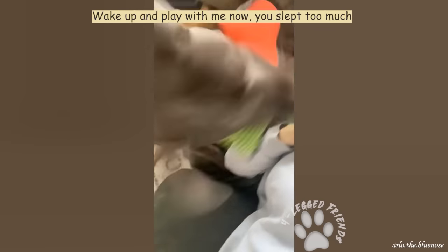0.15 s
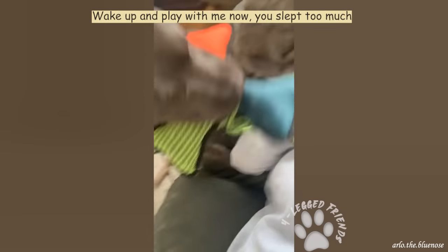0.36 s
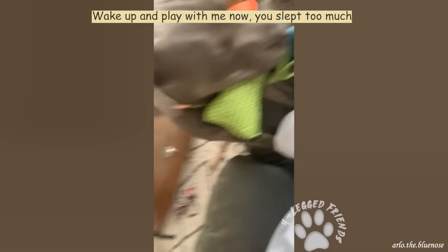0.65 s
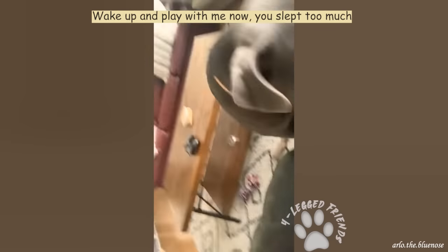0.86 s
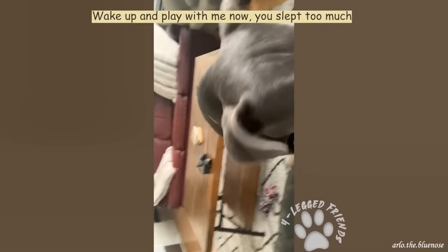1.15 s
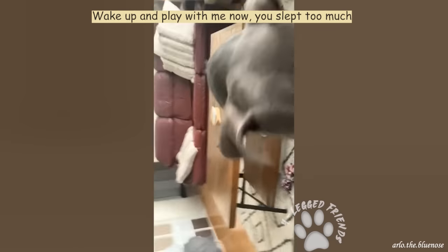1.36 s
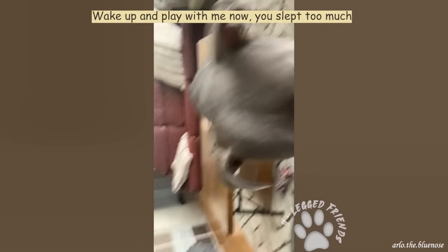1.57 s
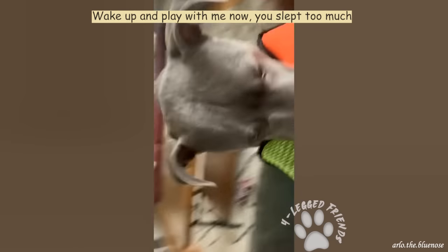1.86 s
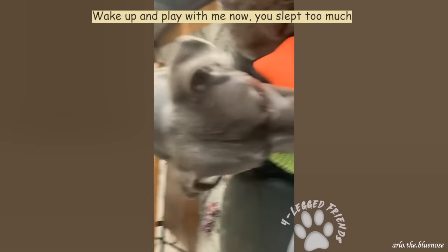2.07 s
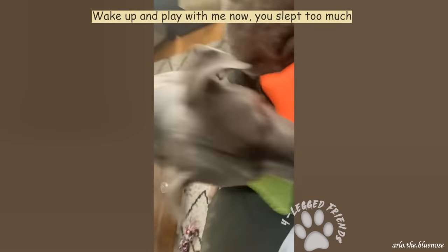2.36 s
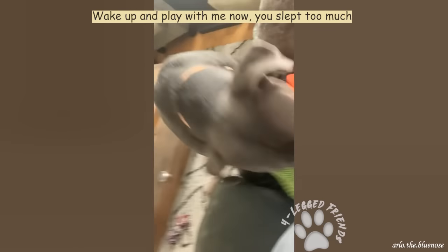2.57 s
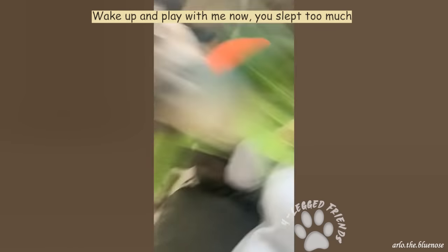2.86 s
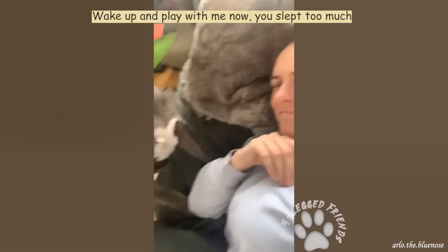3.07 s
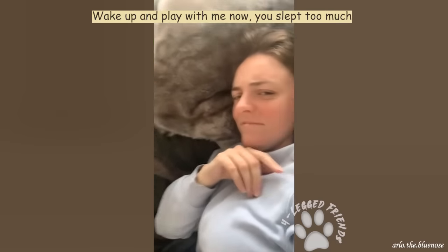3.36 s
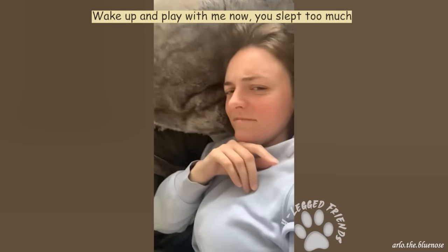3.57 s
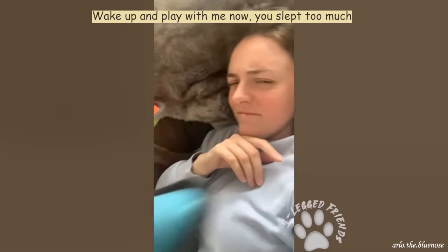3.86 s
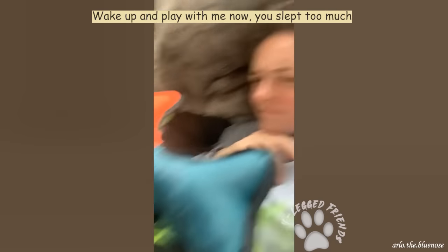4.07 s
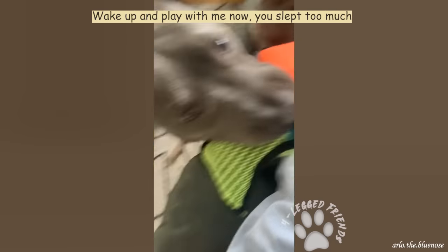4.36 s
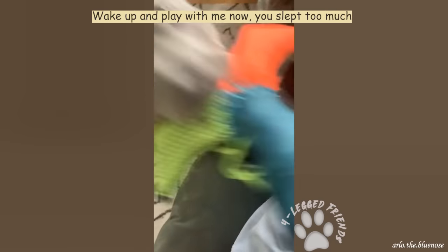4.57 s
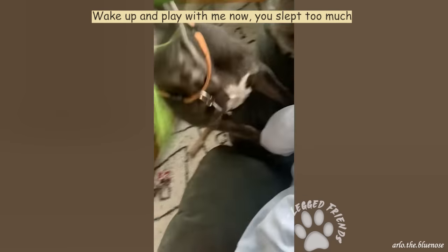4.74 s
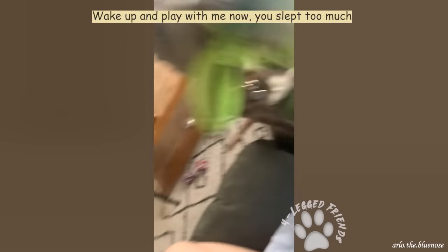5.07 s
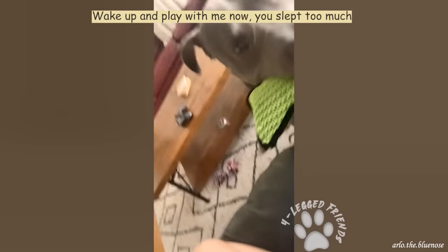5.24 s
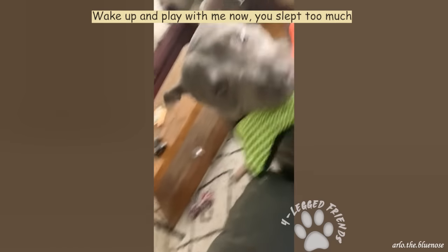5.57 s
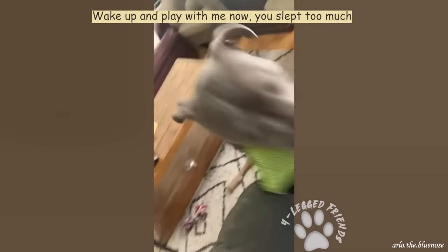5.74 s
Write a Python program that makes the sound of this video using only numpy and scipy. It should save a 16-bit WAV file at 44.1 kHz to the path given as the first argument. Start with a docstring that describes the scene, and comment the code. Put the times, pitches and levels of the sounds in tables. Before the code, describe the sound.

A dog bites a squeaky plush toy close by, sharp squeaks leaping from buzz to high whistle, over a low indoor hum.

```python
"""The room tail of an earlier squeak, fading noise, dies away first over a low hum of wavering sines and rumble.
After two dull knocks, made of damped rings, a dog bites a plush toy close by, in squeaks with a short room tail.
Hard bites sweep a reed from a buzz to a near-pure whistle; thin steady high sines sound during some whistles.
Falling chirps follow as the jaw lets go, and one early soft bite buzzes up and down in pitch.
A low drone swells and fades beneath, the level dips briefly midway, and soft bites and clicks end it."""
import sys
import numpy as np
from scipy import signal
from scipy.fft import rfft, irfft
from scipy.io import wavfile
from scipy.ndimage import uniform_filter1d, minimum_filter1d

SR = 44100
rng = np.random.default_rng(int(sys.argv[2]) if len(sys.argv) > 2 else 0)


def store_pcm(level_fs):
    """Save levels as 16-bit WAV."""
    pcm = np.round(np.clip(level_fs, -1, 1) * 32767).astype(np.int16)
    wavfile.write(sys.argv[1], SR, np.atleast_2d(pcm).T)


N = 260631  # samples
EDGE_HZ = 16300  # top of the audible band


def amp(db):
    """Decibels to gain."""
    return 10 ** (np.asarray(db) / 20)


def unit(x):
    """Scales to rms 1."""
    return x / np.sqrt(np.mean(x ** 2) + 1e-20)


def read(points, hz, axis=1):
    """One column of a table, joined by lines over log frequency."""
    table = np.array(points, float)
    return np.interp(np.log(hz + 1), np.log(table[:, 0] + 1), table[:, axis])


def add(mix, start_s, sound):
    """Mixes a sound in at its start time, cut at the end of the mix."""
    part = mix[round(start_s * SR):][:len(sound)]
    part += sound[:len(part)]


def noise(spectrum, size):
    """White noise shaped to the given spectrum, at rms 1."""
    hz = np.fft.rfftfreq(size, 1 / SR)
    shaped = rfft(rng.standard_normal(size)) * amp(read(spectrum, hz))
    return unit(irfft(shaped, size))


def wander(rate_hz, size):
    """Slow random motion, scaled to rms 1 over at least a second."""
    length = max(size, SR)
    hz = np.fft.rfftfreq(length, 1 / SR)
    slowed = rfft(rng.standard_normal(length)) / (1 + (hz / rate_hz) ** 4)
    return unit(irfft(slowed, length))[:size]


# spectrum shape of the rumble and hiss: freq_hz, relative_level_db
FLOOR_SPECTRUM = [(15, -17), (27, -0.5), (38, -23), (58, 2.5), (80, -7.5), (105, -19.5), (130, -19),
                  (170, -22.5), (280, -24), (420, -27), (800, -29), (2500, -38.5), (4500, -43), (8000, -50),
                  (12500, -50), (15000, -75.5)]
# steady lines of the appliance hum: freq_hz, level_db
HUM_LINES = [(59, -64), (205, -68.5), (468, -67.5), (2310, -74.5)]
# level curve of a low tone that comes and goes: time_s, level_db
DRONE_LEVEL = [(0, -74), (1.12, -61.5), (1.39, -52.5), (2.5, -62), (3.06, -59.5), (4.2, -66), (4.45, -71),
               (5.9, -66.5)]
FLOOR_DB, DRONE_HZ = -44.5, 126.3


def background(phase_drift_rad=0.65, squeak_tail_db=-52, squeak_tail_t60_s=0.52):
    """Low rumble and faint hiss, an appliance's wavering hum, and the room tail of an earlier squeak."""
    t = np.arange(N) / SR
    drone_db = np.interp(t, *np.transpose(DRONE_LEVEL))
    hum = np.zeros(N)
    for hz, db in list(HUM_LINES) + [(DRONE_HZ, drone_db)]:
        phase = 2 * np.pi * hz * t + phase_drift_rad * wander(4.5, N)
        hum += amp(db) * np.sqrt(2) * np.sin(phase)
    squeak_tail = amp(squeak_tail_db - 60 * t / squeak_tail_t60_s) * noise(AIR_SPECTRUM, N)
    swell_db = .7 * wander(3, N)
    return hum + squeak_tail + amp(FLOOR_DB + swell_db) * noise(FLOOR_SPECTRUM, N)


# time for the room tail to fall 60 dB: freq_hz, t60_s
ROOM_DECAY = [(200, 0.61), (700, 0.45), (1850, 0.53), (4880, .53), (9000, 0.45), (13000, 0.41)]
# tone of the room tail: freq_hz, relative_level_db
ROOM_TONE = [(200, 10.5), (1000, 0.5), (2500, 0), (5000, -1), (9000, 4.5), (12500, -2), (15000, 5)]
# reflections from nearby surfaces: delay_s, level_db
NEAR_ECHOES = [(.0023, -42), (.0052, -19.5), (.0087, -25.5), (0.0131, -19)]


def room(x, wet_db=-10, gap_s=0.0091, build_s=0.0021):
    """Direct sound, echoes from nearby surfaces, and a diffuse tail that dies band by band."""
    # the tail starts as sparse clicks of random sign
    clicks = rng.choice([-1., 1.], SR) * (rng.random(SR) < .15)
    hz, t, bands = signal.stft(clicks, SR, nperseg=256)
    decay_db = -60 * t / read(ROOM_DECAY, hz)[:, None]
    bands = bands * amp(read(ROOM_TONE, hz)[:, None] + decay_db)
    tail = signal.istft(bands, SR, nperseg=256)[1]
    tail = tail * np.clip((np.arange(len(tail)) / SR - gap_s) / build_s, 0, 1)
    response = amp(wet_db) * tail / np.linalg.norm(tail)
    response[0] += 1  # direct sound
    for delay_s, db in NEAR_ECHOES:
        response[round(delay_s * SR)] += amp(db)
    return signal.fftconvolve(x, response)[:N]


# soft knocks and mouth clicks: start_s, level_db, ring_hz, decay_s
KNOCK_HITS = [(0.560, -36, 205, 0.0032), (0.600, -41.5, 266, 0.015), (3.664, -43, 243, 0.0081),
              (4.160, -44, 195, 0.0065), (4.522, -39, 1610, 0.00075), (5.365, -27.5, 1970, 0.0003)]


def knocks(scuff=0.13):
    """Dull, quickly damped rings from the dog and the toy, each with a little scuffing noise."""
    t, out = np.arange(SR // 8) / SR, np.zeros(N)
    for start_s, db, hz, decay_s in KNOCK_HITS:
        ring = np.sqrt(2) * np.sin(2 * np.pi * hz * t)
        grit = noise([(hz / 4, -30), (hz, 0), (hz * 2, -10), (hz * 6, -45)], len(t))
        add(out, start_s, amp(db) * (ring + scuff * grit) * np.exp(-t / decay_s))
    return out


# thin steady high tones that sound during some whistles: start_s, end_s, pitch_hz, level_db
HIGH_TONES = [(1.610, 1.626, 9819, -23.5), (1.895, 1.932, 10510, -23.5), (1.930, 1.976, 10510, -37),
              (2.336, 2.411, 9830, -30), (2.833, 2.903, 9800, -25), (3.244, 3.32, 9790, -18.5),
              (3.673, 3.693, 10600, -20), (3.692, 3.77, 9819, -22.5), (4.244, 4.259, 9950, -25)]


def high_tones(waver_db=-1.0, edge_s=0.0025):
    """Thin sines at fixed high pitches, not following the reed; their level wavers."""
    out = np.zeros(N)
    for start_s, end_s, hz, db in HIGH_TONES:
        t = np.arange(max(round((end_s - start_s) * SR), 2)) / SR
        gate = np.clip(np.minimum(t, t[-1] - t) / edge_s, 0, 1)
        tone = np.sqrt(2) * np.sin(2 * np.pi * hz * t)
        add(out, start_s, gate * amp(db + waver_db * wander(60, len(t))) * tone)
    return out


# reed tone from low buzz to high whistle: pitch_hz, overtones_db, air_noise_db
REED_TONE = [(764, -2, -4), (1090, -2.5, -6.5), (1700, 0, -1), (2630, 2, -11), (2800, -3.5, -7.5),
             (3770, -13, 0), (4630, -30, -31), (5200, -32, -29)]
# weight of the overtones leaving the toy: freq_hz, relative_level_db
OVERTONE_SPECTRUM = [(1400, -0.5), (2400, -3), (3400, -5.5), (4600, -12), (5900, -5), (7000, -10),
                     (8200, -9), (11000, -8), (12800, -11.5), (13800, -49.5), (16000, -29.5)]
# weight of the air noise leaving the toy, also used for the earlier squeak's tail: freq_hz, relative_level_db
AIR_SPECTRUM = [(400, -8.5), (900, -19.5), (1400, -8.5), (2700, 1), (4000, 5.5), (6300, -3), (8000, 12.5),
                (10000, 7), (12600, 6.5), (13800, -12), (16000, -38.5)]
# extra weight of the two partials above the whistle: freq_hz, relative_level_db
WHISTLE_SPECTRUM = [(7000, -5.5), (8200, -6.5), (9000, -20.5), (9700, -20), (10300, -18), (11500, -25),
                    (13200, -25.5), (14200, -23.5), (14900, -33), (15800, -37.5)]


def reed(hz, bloom_s, treble_db=0, bright_db=0, buzz_jitter=.02, whistle_jitter=0.00077, flutter_db=1.22,
         rasp=1.5, rasp_hz=4020, rasp_width_hz=200, smear=0.12):
    """The reed chops the air stream: a fundamental, overtones, and a puff of noise each cycle."""
    size = len(hz)
    whistling = read([(2900, 0), (3700, 1)], hz)  # 0 = buzz, 1 = whistle
    jitter = buzz_jitter + (whistle_jitter - buzz_jitter) * whistling
    phase = 2 * np.pi * np.cumsum(hz * (1 + jitter * wander(460, size))) / SR
    # near the bottom of its range the whistle is unstable and its upper partials turn raspy
    unsteady = smear + rasp * np.exp(-((hz - rasp_hz) / rasp_width_hz) ** 2)
    treble_tilt = [(7000, 0), (12000, treble_db)]

    def partials(spectrum, count):
        """Multiples of the pitch below count, each a little unsteady in phase."""
        total = np.zeros(size)
        for k in range(2, count):
            level = amp(read(spectrum, k * hz) + read(treble_tilt, k * hz))
            in_band = k * hz < EDGE_HZ
            wobble = rng.uniform(0, np.pi) + unsteady * wander(530, size)
            total += level * in_band * np.cos(k * phase + wobble)
        return total

    overtones = amp(read(REED_TONE, hz, axis=1)) * partials(OVERTONE_SPECTRUM, count=20)
    overtones += whistling * partials(WHISTLE_SPECTRUM, count=4)
    air_spectrum = [(f, db + read(treble_tilt, f)) for f, db in AIR_SPECTRUM]
    air = noise(air_spectrum, size) * amp(treble_db / 2)
    puffing = 1 + (.7 - .5 * whistling) * np.cos(phase)
    puffs = amp(read(REED_TONE, hz, axis=2)) * air * puffing
    # the reed starts softly and only then beats hard enough for its overtones to bloom
    beating = 1 - np.exp(-np.arange(size) / SR / bloom_s)
    fundamental = np.sqrt(2) * np.cos(phase)
    sound = fundamental + amp(bright_db) * beating * (np.sqrt(2) * overtones + puffs)
    # the whistle is steadier than the buzz
    return sound * amp(flutter_db * (1.5 - 0.93 * whistling) * wander(110, size))


# short falling chirps as the jaw lets go: start_s, level_db (before the trim), start_pitch_hz
CHIRP_FALLS = [(0.820, -26.5, 2323), (1.640, -28, 2456), (2.001, -29.5, 2410), (2.133, -38, 1860),
               (2.454, -31.5, 2350), (2.507, -36, 2530), (2.947, -25.5, 2456), (2.999, -39, 1710),
               (3.348, -24, 2336), (3.408, -36, 1420), (3.793, -23.5, 2397), (4.285, -23, 2365),
               (4.372, -35, 1440)]
# weak chirps are duller: level_db (before the trim), overtones_db
CHIRP_TONE = [(-36.5, -14), (-28, 3), (-22, -2)]


def chirps(rest_hz=680, fall_s=0.0028, rise_s=0.0016, trim_db=-1, bloom_s=0.0014):
    """The last air escapes and the reed slides down to its resting pitch."""
    t, out = np.arange(SR // 40) / SR, np.zeros(N)
    swell = (t / rise_s * np.exp(1 - t / rise_s)) ** 0.43
    for start_s, db, start_hz in CHIRP_FALLS:
        hz = rest_hz + (start_hz - rest_hz) * np.exp(-t / fall_s)
        bright_db = np.interp(db, *np.transpose(CHIRP_TONE))
        add(out, start_s, amp(db + trim_db) * swell * reed(hz, bloom_s, bright_db=bright_db))
    return out


# how strongly the reed sounds, weak between buzz and whistle: pitch_hz, fundamental_db
REED_LOUDNESS = [(720, -42), (860, -31.5), (1150, -25.5), (1700, -18.5), (2050, -21.5), (2400, -16),
                 (2800, -11.5), (3450, -21), (4050, -20), (4700, -16), (5200, -15.5)]


def squeak(hz, db, treble_db, bright_db, attack_s=0.0028, release_s=0.0081, bloom_s=0.0018):
    """One squeeze of air through the reed; its loudness follows its pitch."""
    t = np.arange(len(hz)) / SR
    gate = np.clip(np.minimum(t / attack_s, (t[-1] - t) / release_s), 0, 1)
    return gate * amp(db + read(REED_LOUDNESS, hz)) * reed(hz, bloom_s, treble_db, bright_db)


REST_HZ, FALL_POWER = 721.5, 2.5  # the buzz settles to this pitch, this steeply
# the teeth slip a little: share of the pitch above rest, level, rate
UNEVEN, UNEVEN_DB, UNEVEN_RATE_HZ = .07, 2, 110
# bites where the reed only buzzes up and down: start_s, rise_s, fall_s, length_s, first_hz, top_hz,
# level_db (on top of the loudness by pitch), treble_db (ramps in from 7 to 12 kHz), overtones_db
SOFT_SQUEEZES = [(1.158, 0.037, .023, .120, 810, 2567, -3, 0, 3),
                 (4.549, .014, .008, 0.093, 1102, 2057, 2, 0.5, 1),
                 (4.88, 0.015, 0.02, 0.072, 1147, 2550, -1.5, 0, 1.5),
                 (4.934, .018, 0.015, 0.072, 869, 1032, -2.5, -1.5, 3.5),
                 (5.383, .016, 0.019, 0.081, 914, 1175, 1, 3, 1.5),
                 (5.69, 0.018, 0.021, 0.1, 864, 1062, -0.5, 3.5, 1.5)]


def soft_bites(rise_power=2.8, eased_db=-2.0):
    """Pressure swells and eases unevenly: the buzz climbs, then slides back to rest, weaker on the way."""
    out = np.zeros(N)
    for start_s, rise_s, fall_s, length_s, first_hz, top_hz, db, treble_db, bright_db in SOFT_SQUEEZES:
        t = np.arange(0, length_s, 1 / SR)
        climb = np.sin(np.pi / 2 * np.minimum(t / rise_s, 1)) ** rise_power
        climb_hz = first_hz + (top_hz - first_hz) * climb
        pressure = 1 / (1 + (np.maximum(t - rise_s, 0) / fall_s) ** FALL_POWER)
        slip = wander(UNEVEN_RATE_HZ, len(t))
        hz = REST_HZ + (climb_hz - REST_HZ) * pressure * (1 + UNEVEN * slip)
        level_db = db + eased_db * (1 - pressure) + UNEVEN_DB * slip
        add(out, start_s, squeak(hz, level_db, treble_db, bright_db))
    return out


# the reed starts at this pitch; the jump takes this share of the time before it
BUZZ_HZ, JUMP_SHARE = 1067.6, .19
# the held whistle wavers, then sags as the air runs out
SAG_S, WAVER_HZ, WAVER_RATE_HZ = .03, 40, 40
# bites where the reed jumps from buzz to whistle: start_s, jump_s (after the start), length_s,
# first_whistle_hz, last_whistle_hz (before the sag), arch_hz, final_sag_hz,
# buzz_db, whistle_db (both on top of the loudness by pitch), fade_by_end_db,
# treble_db (ramps in from 7 to 12 kHz), overtones_db
HARD_SQUEEZES = [(0.7421, .0190, 0.056, 4793, 4670, 52, 1000, -0.5, -1.5, -11.5, 4, 3),
                 (1.515, .0150, 0.12, 4415, 4740, 370.5, 1051, -2, -1.5, 0, 4.5, 3),
                 (1.857, 0.015, 0.13, 4703, 5220, 200, 351, -1.5, -0.5, -19, 7, 1),
                 (2.318, .0170, 0.13, 4745, 4718, -0.5, 5.5, 0.5, -3.5, -22, 3, -2.5),
                 (2.823, 0.017, .098, 4980, 5020, 51, -1, 2.5, -2, -2.5, 1.5, 0.5),
                 (3.224, .0178, .121, 4780, 4726, 30.5, 1152, 0.5, -4, 4.5, 4.5, 1),
                 (3.655, 0.012, 0.13, 5130, 4686, 30, 1252, 1.5, 1.5, -1.5, -4, 1),
                 (4.154, 0.0097, 0.12, 4905, 4267, 151.5, 594, 1, 2, -3.5, 0, 2.5)]


def hard_bites(fade_power=2.1):
    """Pressure builds fast: the buzz leaps to a whistle, which holds, drifts and sags."""
    out = np.zeros(N)
    for (start_s, jump_s, length_s, first_hz, last_hz, arch_hz, sag_hz,
         buzz_db, whistle_db, fade_db, treble_db, bright_db) in HARD_SQUEEZES:
        t = np.arange(0, length_s, 1 / SR)
        jumped = .5 + .5 * np.tanh((t - jump_s) / (2 * JUMP_SHARE * jump_s))
        held = np.clip((t - jump_s) / (length_s - jump_s), 0, 1)
        sag = np.clip(1 - (length_s - t) / SAG_S, 0, 1)
        whistle_hz = first_hz + (last_hz - first_hz) * held
        whistle_hz += arch_hz * np.sin(np.pi * held) - sag_hz * sag
        whistle_hz += WAVER_HZ * wander(WAVER_RATE_HZ, len(t))
        hz = BUZZ_HZ + jumped * (whistle_hz - BUZZ_HZ)
        db = buzz_db + (whistle_db - buzz_db) * jumped ** 2 + fade_db * held ** fade_power
        add(out, start_s, squeak(hz, db, treble_db, bright_db))
    return out


def scene(lowest_hz=520):
    """The toy and the dog in the room, over the background."""
    # the small squeaker radiates little bass
    bass_cut = signal.butter(2, lowest_hz, "highpass", fs=SR, output="sos")
    toy = signal.sosfilt(bass_cut, hard_bites() + soft_bites() + chirps() + high_tones())
    return (room(toy + knocks()) + background())[None]


# the level dips briefly: start_s, end_s, level_db
LEVEL_DIP = (2.518, 2.536, -18)


def record(dry):
    """A peak limiter holds the sharpest squeaks down; then a brief dip and the band limit."""
    need = np.minimum(1, .8 / (abs(dry[0]) + 1e-9))  # gain that keeps each sample within 0.8
    limiter = uniform_filter1d(minimum_filter1d(need, size=129), size=129)
    t = np.arange(N) / SR
    start_s, end_s, db = LEVEL_DIP
    inside = 1. * ((t > start_s) & (t < end_s))
    dip = amp(db * uniform_filter1d(inside, size=90))
    lowpass = signal.firwin(511, EDGE_HZ, window=("kaiser", 9), fs=SR)
    return signal.oaconvolve(dry * limiter * dip, lowpass[None], "same")


dry = scene()
out = record(dry)
store_pcm(out)
```